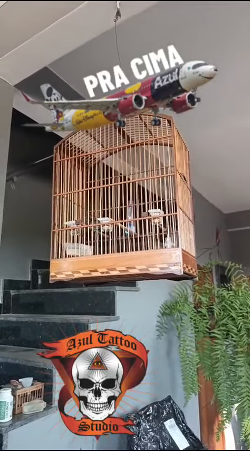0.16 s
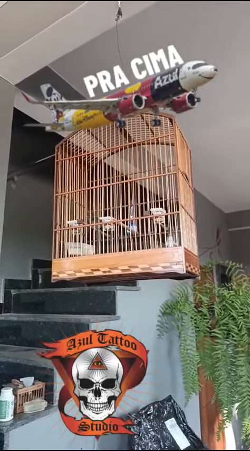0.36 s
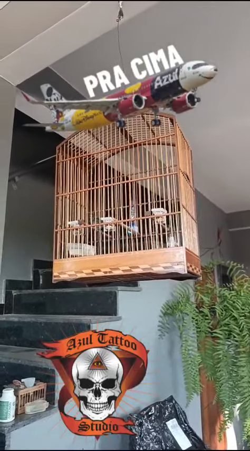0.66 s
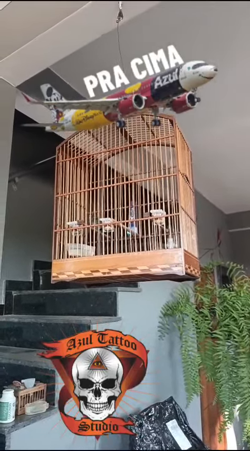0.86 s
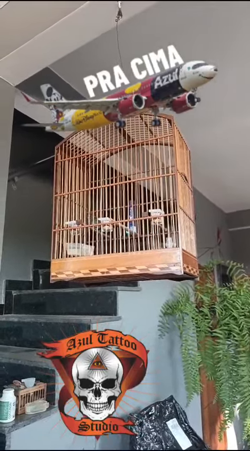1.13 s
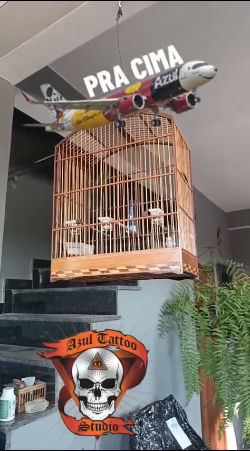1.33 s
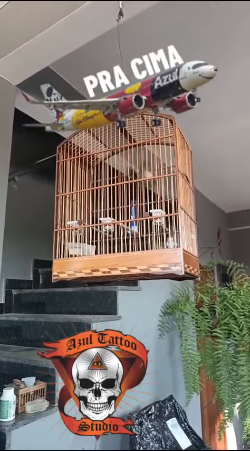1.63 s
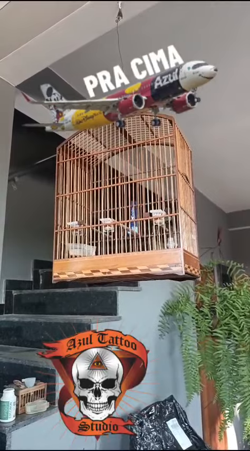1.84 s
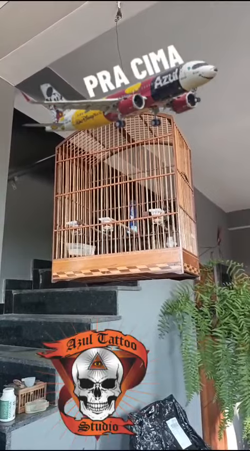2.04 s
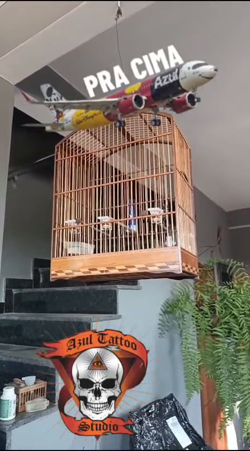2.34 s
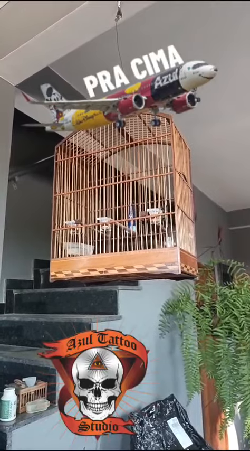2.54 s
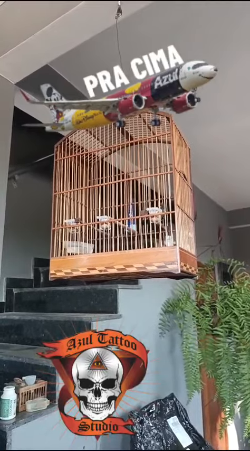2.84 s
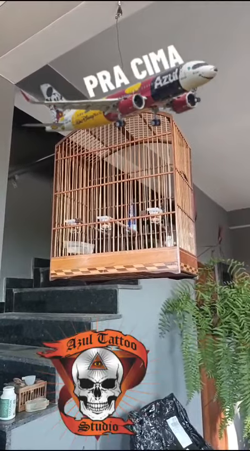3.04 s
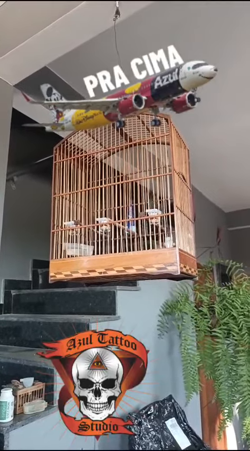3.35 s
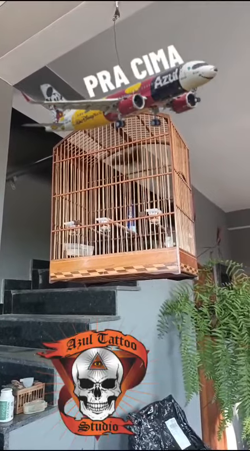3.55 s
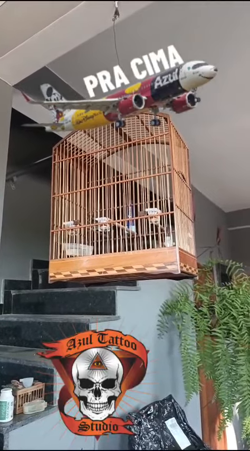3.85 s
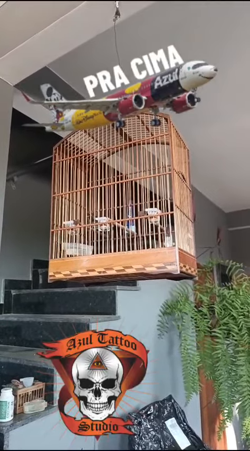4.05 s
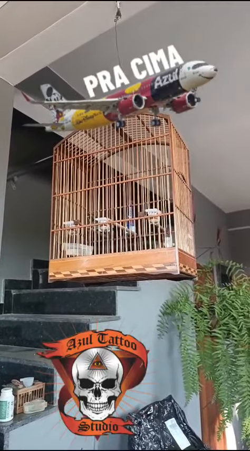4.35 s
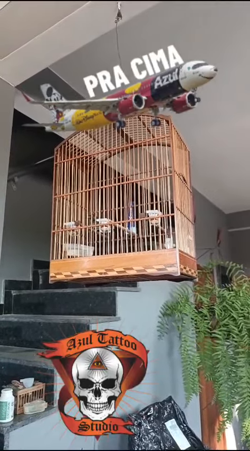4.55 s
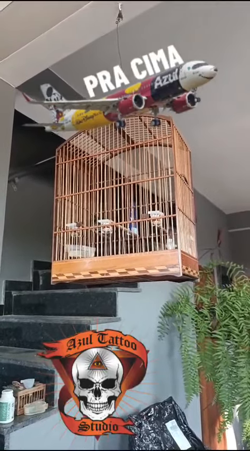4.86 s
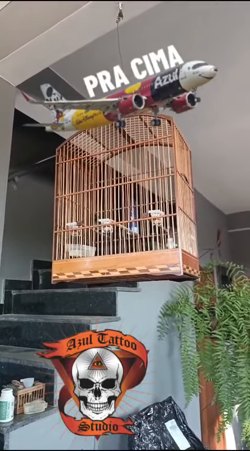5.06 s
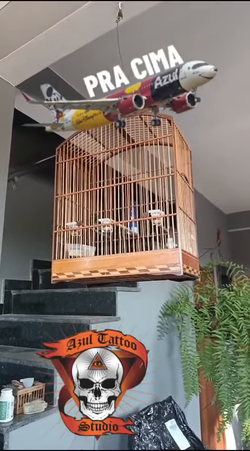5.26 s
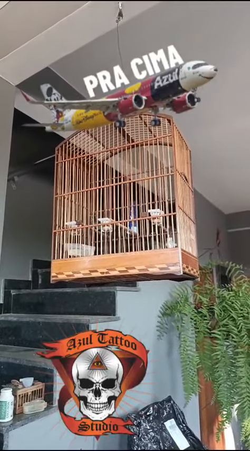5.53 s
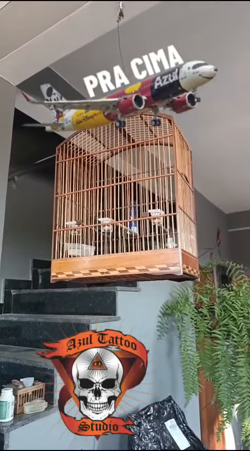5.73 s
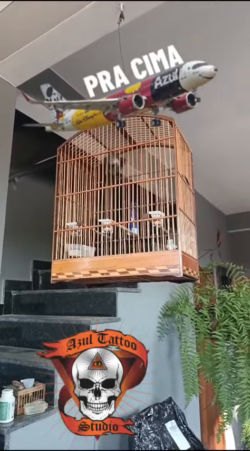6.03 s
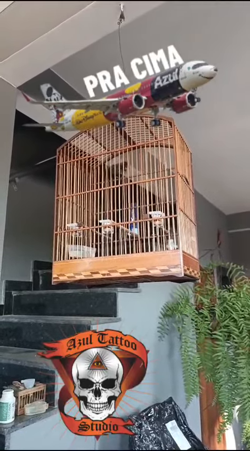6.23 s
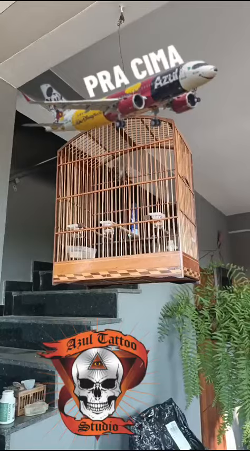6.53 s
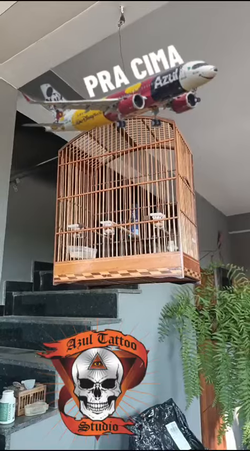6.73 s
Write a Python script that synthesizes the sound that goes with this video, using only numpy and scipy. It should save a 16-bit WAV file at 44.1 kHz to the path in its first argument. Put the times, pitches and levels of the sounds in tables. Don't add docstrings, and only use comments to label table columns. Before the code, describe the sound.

A small bird close by in a hard-walled room repeats a thin, very high song: sparse chips quicken into a trill, then a short buzz, whistle and sharp drop. Fainter birds answer as echoing room sound. Tiny beak and claw ticks touch the cage bars. Low traffic murmur and engine hum seep in from outside, captured by a phone.

```python
import sys
import numpy as np
from scipy import signal
from scipy.fft import rfft, irfft, next_fast_len
from scipy.io import wavfile
from scipy.ndimage import uniform_filter1d

SR = 44100
rng = np.random.default_rng(int(sys.argv[2]) if len(sys.argv) > 2 else 0)


def waveform_to_disk(signal):
    frames = np.transpose(np.atleast_2d(signal))
    scaled = np.clip(frames, -1, 1) * 32767
    samples = np.round(scaled).astype(np.int16)
    wavfile.write(sys.argv[1], SR, samples)


def gain_from_db(level_db):
    decades = np.asarray(level_db, float) / 20
    return 10 ** decades


N = 303849
LEAD = SR // 2

# (frequency [Hz], density [dB per Hz])
STREET_COLOUR = [(15, -58), (25, -18), (107, 1.5), (177, -1), (425, -11), (666, -12), (940, -18),
                 (1510, -18), (2250, -20.5), (7030, -43), (9410, -38.5), (10700, -42), (14000, -43.5)]
# (frequency [Hz], left-right correlation [0-1])
STREET_LIKENESS = [(30, .92), (80, 0.98), (250, 0.81), (500, 0.64), (1000, .1), (4000, .01)]
# (time [s], level [dB])
TRAFFIC = [(0, -53.5), (.73, -56.5), (1.5, -53.5), (1.94, -55), (2.3, -57), (3.4, -58.5), (3.63, -57),
           (3.8, -57), (4.4, -58), (4.72, -55.5), (5.62, -55), (6.1, -54), (6.4, -53), (6.89, -52.5)]
# (from [Hz], to [Hz], level above the traffic [dB], share of its swell [ratio])
STREET_LAYERS = [
    (0, 270, 2.5, 1.7),
    (273.4, 950, -0.16, 1.38),
    (953, 30000, -2.5, 1),
]
# (time [s], pitch [Hz], level [dB])
HEAVY_ENGINE = [(0, 135.3, -43.5), (.8, 134.8, -48), (1.55, 110.4, -50), (2.1, 120, -70.5), (2.7, 130, -57),
                (3.3, 116.6, -67), (4.7, 130.2, -57.5), (5.6, 124.3, -66.5), (6.05, 115.3, -41),
                (6.4, 121.5, -55), (6.89, 119.9, -46)]
# (time [s], pitch [Hz], level [dB])
LIGHT_ENGINE = [(0, 204.5, -52), (1.55, 203.5, -48), (2.1, 191.3, -56.5), (2.7, 184, -55),
                (3.3, 181, -67.5), (4.7, 176.6, -57), (5.7, 187, -64), (6.4, 209.5, -78.5),
                (6.89, 205, -67)]

# (time [s], length [s], start pitch [Hz], end pitch [Hz], level [dB])
FAR_WHISTLES = [(.92, 0.033, 6300, 5800, -70.5), (3.01, 0.055, 5650, 5210, -62.5),
                (3.23, 0.035, 4100, 4360, -67), (3.31, .14, 4470, 4380, -65.5),
                (3.42, 0.028, 5900, 5820, -70), (3.58, 0.04, 3750, 4290, -56),
                (3.885, 0.081, 4060, 3950, -61), (4.24, 0.062, 5730, 5910, -51.5),
                (4.36, 0.064, 4350, 4050, -50.5), (4.70, 0.062, 7240, 6800, -68.5),
                (5.44, .035, 6920, 6860, -80)]
# (time [s], length [s], start pitch [Hz], end pitch [Hz], level [dB])
FAR_CHATTER = [(.6, .2, 6280, 3400, -71), (1.0, 0.11, 2980, 2930, -75), (1.5, 0.054, 4390, 4160, -42.5),
               (2.54, 0.15, 3287, 3146, -63), (3.04, 0.13, 3405, 2850, -63),
               (3.27, 0.064, 5270, 4980, -64.5), (3.49, .14, 3310, 3212, -58.5),
               (4.42, 0.088, 3155, 2885, -59), (4.76, 0.067, 6330, 4360, -54),
               (4.98, 0.052, 6760, 5390, -54), (5.04, .064, 3590, 3220, -68.5)]
# (time [s], level [dB], buzz [dB], drop [dB], slowness [ratio])
FAR_PHRASES = [
    (.33, -63, 0, 1.5, 1.7),
    (1.205, -45.5, 8, 6.5, 1.33),
    (3.995, -46, 5, 8, 1.33),
]

# (time [s], centre [Hz], width [Hz], level [dB])
CAGE_TICKS = [(.54, 13500, 1800, -60), (1.003, 8860, 886, -44.5), (1.553, 2240, 1200, -45.5),
              (3.076, 9100, 800, -49), (3.325, 8160, 502, -59), (3.485, 7520, 3950, -52.5),
              (3.600, 6000, 5000, -50), (3.751, 6000, 4960, -48), (5.422, 7990, 900, -59.5),
              (5.670, 8200, 800, -54), (5.938, 6000, 4000, -57.5), (3.39, 13500, 2004, -60),
              (5.84, 14000, 1500, -63), (6.705, 12500, 2500, -60.5)]
# (time [s], length [s], end pitch [Hz], level [dB])
OPENING_CHIPS = [ (0.699, 0.01, 10070, -39.5), (0.871, 0.014, 10900, -33.5), (1.001, 0.0086, 9850, -35),
                 (1.142, 0.011, 10550, -31), (1.216, 0.014, 11230, -30.5), (1.297, 0.01, 10350, -32),
                 (1.363, 0.0073, 10630, -28), (2.698, 0.011, 10000, -37), (2.952, 0.0094, 10480, -32.5),
                 (3.074, 0.01, 10500, -31.5), (3.243, 0.01, 10700, -32), (3.4, 0.013, 9950, -38),
                 (5.096, 0.0167, 9780, -47.5), (5.313, 0.027, 10940, -42.5), (5.417, .017, 10170, -37.5),
                 (5.561, 0.0185, 10720, -37), (5.665, 0.019, 10430, -34), (5.793, 0.013, 10340, -36.5),
                 (5.876, 0.015, 10270, -38.5)]
# (time [s], start pitch [Hz], level [dB])
TRILL_FLICKS = [ (1.452, 11240, -36), (1.51, 10740, -37), (1.564, 10080, -36), (1.610, 12040, -34),
                (1.654, 12500, -32.5), (1.694, 12860, -35.5), (1.734, 11800, -31.5), (1.763, 12930, -28),
                (1.786, 13140, -20), (3.477, 9920, -41), (3.526, 11150, -37), (3.572, 11040, -34),
                (3.616, 12430, -31.5), (3.657, 11970, -25.5), (3.696, 10360, -33), (3.758, 12830, -25.5),
                (5.930, 10830, -38), (5.978, 11550, -36.5), (6.021, 11400, -37), (6.06, 12080, -32),
                (6.1, 12830, -30), (6.142, 11060, -34), (6.174, 10020, -37), (6.195, 13660, -24)]
# (time [s], level [dB], buzz [dB], drop [dB], slowness [ratio])
NEAR_PHRASES = [
    (-.215, -21, 1.5, 2, 0.99),
    (1.803, -20, 2, 2, 1),
    (3.780, -19.5, 1.5, 3, 1),
    (6.213, -19, 1.5, 0.5, 1),
]
# (start pitch [Hz], end pitch [Hz], level [dB])
SYLLABLES = [
    (7260, 7400, -4),
    (7790, 7500, -1),
    (7950, 7600, -3),
    (6047, 6450, -2.5),
    (6000, 3720, -2),
]
# (time [s], pitch [Hz], level [dB])
SECOND_VOICE = [
    (0, 9500, -12.5),
    (0.029, 9570, -8),
    (.07, 8900, -8),
    (.105, 9340, -10),
    (.112, 8650, -24),
]

# (frequency [Hz], reverberation time [s])
ROOM_DECAY = [(2500, 1.4), (4000, 0.78), (5500, 0.67), (7700, 0.6), (11000, 0.34), (15500, 0.44)]
# (left delay [s], right delay [s], level [dB])
ECHOES = [
    (.0047, .0040, -5),
    (.0095, .0103, -11),
    (.0138, .0151, -12),
]
# (frequency [Hz], faintest band kept [dB])
GATE_FLOOR = [(3000, -104), (6000, -99), (9500, -96), (10500, -89), (16000, -88)]

# (start [s], end [s])
BUZZ_S, SWEEPS_S, WHISTLE_S, HOOK_S, DROP_S = (0, .075), (.082, .108), (.114, .172), (.175, .186), (.190, .216)
RELEASE_S = .004


def on_log(hz, table):
    table_hz, values = np.transpose(table)
    return np.interp(np.log(np.maximum(hz, 1)), np.log(table_hz), values)


def walk(rate, size):
    hold = int(SR / rate)
    steps = np.repeat(rng.standard_normal(size // hold + 1), hold)
    return 1.3 * uniform_filter1d(uniform_filter1d(steps, hold), hold)[:size]


def add(track, s, sound):
    i = int(s * SR) + LEAD
    track[..., i:i + sound.shape[-1]] += sound


def sine(hz):
    return np.sin(2 * np.pi * np.cumsum(hz) / SR)


def town():
    quiet_street_db = -56
    busy_db = np.interp(np.arange(N) / SR, *np.transpose(TRAFFIC)) - quiet_street_db
    size = next_fast_len(N)
    hz = np.arange(size // 2 + 1) * SR / size
    like = np.clip(on_log(hz, STREET_LIKENESS), 0, 1)
    mid, side = rfft(rng.standard_normal((2, size)))
    pair = np.sqrt(1 + like) * mid + np.sqrt(1 - like) * side * np.array([[1], [-1]])
    pair = gain_from_db(on_log(hz, STREET_COLOUR)) * pair
    out = 0
    for low_hz, high_hz, db, share in STREET_LAYERS:
        band = irfft(pair * (hz >= low_hz) * (hz < high_hz), size)[:, :N]
        swell_db = quiet_street_db + db + share * busy_db + 1.5 * walk(6.6, N)
        out = out + band / np.std(band.mean(axis=0)) * gain_from_db(swell_db)
    return out


def hum(table, throb_db, waver_hz):
    s, *columns = np.transpose(table)
    hz, db = (np.interp(np.arange(N) / SR, s, c) for c in columns)
    return gain_from_db(db + throb_db * walk(12, N)) * sine(hz + waver_hz * walk(10, N))


def engines():
    return hum(HEAVY_ENGINE, throb_db=3.0, waver_hz=6) + hum(LIGHT_ENGINE, throb_db=4.0, waver_hz=4.5)


def glides(table, edge_s, warble_hz):
    out = np.zeros(N + LEAD)
    for s, length, start_hz, low_hz, end_hz, db in table:
        t = np.arange(int(length * SR)) / SR
        down, up = abs(start_hz - low_hz), abs(end_hz - low_hz)
        turn = length * np.clip(down / (down + up + 1) + 0.071, .1, .9)
        falling = down * np.abs(1 - t / turn) ** 1.6
        rising = up * (np.abs(t - turn) / (length - turn)) ** 1.1
        hz = low_hz + np.where(t < turn, falling, rising) + warble_hz * walk(350, len(t))
        edge = np.clip(np.minimum(t / (.3 * length), (length - t) / edge_s), 0, 1)
        throat_db = -4.3 * np.abs(hz - low_hz) / 1000
        add(out, s, gain_from_db(db + throat_db) * edge * sine(hz))
    return out


def calls(table, dip, edge_s, warble_hz):
    bent = [(s, length, a, (1 - dip) * min(a, b), b, db) for s, length, a, b, db in table]
    return glides(bent, edge_s, warble_hz)


def ticks():
    out, size = np.zeros(N + LEAD), 512
    hz = np.arange(size // 2 + 1) * SR / size
    decay = np.exp(-np.arange(size) / SR / 0.0031)
    for s, centre_hz, width_hz, db in CAGE_TICKS:
        ring = np.exp(-.5 * ((hz - centre_hz) / width_hz) ** 2)
        colour = ring + gain_from_db(-13) * (hz > 11000)
        burst = irfft(rfft(rng.standard_normal(size)) * colour)
        add(out, s, gain_from_db(db) * burst / np.std(burst) * decay)
    return out


def chips():
    slow = [(s, length, 9850, 9416, end_hz, db) for s, length, end_hz, db in OPENING_CHIPS]
    trill = []
    for s, start_hz, db in TRILL_FLICKS:
        length = .0075 * np.exp(.025 * (-32.5 - db))
        trill.append((s, length, start_hz, 8840, 8900, db))
    return glides(slow + trill, edge_s=0.002, warble_hz=5)


def song_controls(t):
    dip_s = .003
    from_hz, to_hz, db = np.transpose(SYLLABLES)
    edges = np.ravel([BUZZ_S, SWEEPS_S, WHISTLE_S, HOOK_S, DROP_S])
    hz = np.interp(t, edges, np.ravel([from_hz, to_hz], order="F"))
    sweep_hz = np.interp(t, [SWEEPS_S[1], WHISTLE_S[0]], [1370, 40])
    rate = np.interp(t, [BUZZ_S[1], SWEEPS_S[0]], [200, 60])

    def along(part):
        return np.clip((t - part[0]) / (part[1] - part[0]), 0, 1)

    level = np.interp(t, edges, np.repeat(db, 2)) - 8.5 * np.exp(-t / .03)
    level = level - 6 * along(WHISTLE_S) ** 2 * (t < HOOK_S[0])
    jump_s = (WHISTLE_S[1] + HOOK_S[0]) / 2
    level = level - 24 * np.clip(1 - np.abs(t - jump_s) / dip_s, 0, 1)
    drop_in = np.clip((t - HOOK_S[1]) / dip_s, 0, 1)
    level = level - 14 * np.abs(2 * along(DROP_S) - .85) ** 3 * drop_in
    return hz, sweep_hz, rate, level - 35.5 * np.clip((t - DROP_S[1]) / RELEASE_S, 0, 1)


def phrases(table, overtone_db, wobble_hz):
    out = np.zeros((2, N + LEAD))
    pan = gain_from_db([[-2.5], [2.5]])
    treble = signal.butter(4, 11500, "high", fs=SR, output="sos")
    upper_s, *upper_columns = np.transpose(SECOND_VOICE)
    for start, level_db, buzz_db, drop_db, slowness in table:
        t = np.arange(int((DROP_S[1] + RELEASE_S) * slowness * SR)) / SR / slowness
        hz, sweep_hz, rate, db = song_controls(t)
        cycle = np.cumsum(rate * (1 + 0.06 * walk(80, len(t)))) / SR % 1
        swept = np.clip(sweep_hz / 600, 0, 1)
        pulse = 1 - swept + swept * np.sin(np.pi * cycle ** 0.91) ** 2
        pitch = hz + sweep_hz * (2 * cycle - 1) + wobble_hz * walk(300, len(t))
        phase = 2 * np.pi * np.cumsum(pitch) / SR
        breath_db = level_db + db + swept * buzz_db + (t > WHISTLE_S[1]) * drop_db
        breath = gain_from_db(breath_db + 0.44 * walk(200, len(t))) * pulse
        upper_hz, upper_db = (np.interp(t, upper_s, c) for c in upper_columns)
        upper = gain_from_db(level_db + buzz_db + upper_db) * pulse * sine(upper_hz + 1500 * (cycle - .5))
        beak_db = -np.abs(2 * pitch - 14900) / 230 - 8 * (t > HOOK_S[1])
        overtone = gain_from_db(overtone_db + beak_db) * np.sin(2 * phase) * gain_from_db([[0], [-11]])
        air = gain_from_db(-25) * signal.sosfilt(treble, rng.standard_normal(len(t)))
        add(out, start, (breath * (np.sin(phase) + overtone + air) + upper) * pan)
    return out


def room():
    t = np.arange(SR) / SR
    hz = np.arange(SR // 2 + 1)
    noise, tail = rfft(rng.standard_normal((2, SR))), 0
    for centre_hz in range(2000, 18000, 1000):
        band = irfft(noise * np.clip(1 - np.abs(hz - centre_hz) / 1000, 0, 1))
        decay_db = -60 * t / on_log(centre_hz, ROOM_DECAY)
        tail = tail + band * gain_from_db(decay_db - 0.067 * centre_hz / 1000)
    tail = tail * np.clip(t / .009, 0, 1) * (1 + .15 * np.exp(-t / .03))
    return tail / np.sqrt(np.mean(np.sum(tail ** 2, axis=1)))


def heard(song, tail, wet_db):
    response = gain_from_db(wet_db) * tail
    response[:, 0] += 1
    for left_s, right_s, db in ECHOES:
        response[[0, 1], [int(left_s * SR), int(right_s * SR)]] += gain_from_db(db)
    return signal.fftconvolve(song * np.ones((2, 1)), response, axes=1)[:, LEAD:LEAD + N]


def scene():
    outside = town() + engines()
    far = calls(FAR_WHISTLES, dip=0.023, edge_s=0.015, warble_hz=85)
    far = far + calls(FAR_CHATTER, dip=.05, edge_s=0.044, warble_hz=239.2)
    far = far + phrases(FAR_PHRASES, overtone_db=-11, wobble_hz=367)
    near = (chips() + ticks()) * gain_from_db([[-2.5], [2.5]])
    near = near + phrases(NEAR_PHRASES, overtone_db=0.5, wobble_hz=34.75)
    return outside + heard(gain_from_db(-10) * far, room(), wet_db=20) + heard(near, room(), wet_db=6.5)


def gate(x):
    frame, bins, from_hz = 2048, 16, 3300
    window = np.sin(np.pi * (np.arange(frame) + .5) / frame)
    shape = dict(window=window, nperseg=frame, noverlap=frame // 2)
    z = signal.stft(x, **shape)[2]
    power = np.mean(np.abs(z[:, :-1]) ** 2, axis=0).reshape(-1, bins, z.shape[2]).sum(axis=1)
    db = 10 * np.log10(power + 1e-18)
    hz = (np.arange(len(db)) + .5)[:, None] * bins * SR / frame
    slope = np.where(hz < 11200, 1.9, 1.7)
    loudest_db = db[hz[:, 0] > from_hz].max(axis=0)
    masked_db = .6 * loudest_db - 52 - np.abs(hz / 1000 - 11.2) * slope
    limit = np.maximum(on_log(hz, GATE_FLOOR), masked_db)
    flutter = 4 * rng.standard_normal(db.shape[1]) + 4 * rng.standard_normal(db.shape)
    limit = limit + uniform_filter1d(flutter, size=2)
    z[:, :-1] *= np.repeat((db > limit) | (hz < from_hz), bins, axis=0)
    return signal.istft(z, **shape)[1][:, :N]


def band_limit(x):
    return signal.sosfilt(signal.butter(12, 16830, fs=SR, output="sos"), x)


def record(dry):
    dry = signal.sosfilt(signal.ellip(10, .2, 80, 15900, fs=SR, output="sos"), dry)
    dry = signal.sosfilt(signal.butter(2, 45, "high", fs=SR, output="sos"), dry)
    return band_limit(gate(dry))


dry = scene()
out = record(dry)
waveform_to_disk(out)
```